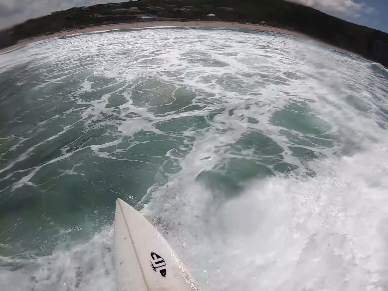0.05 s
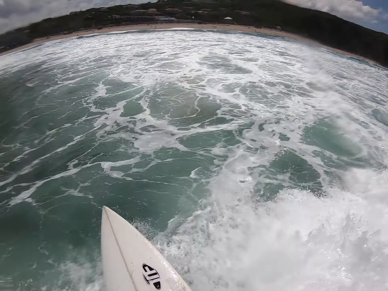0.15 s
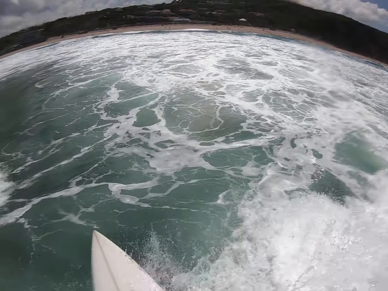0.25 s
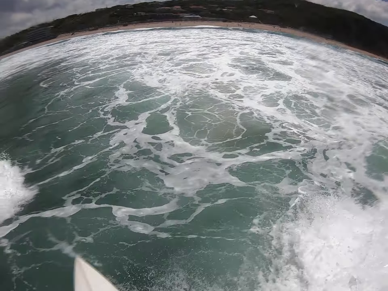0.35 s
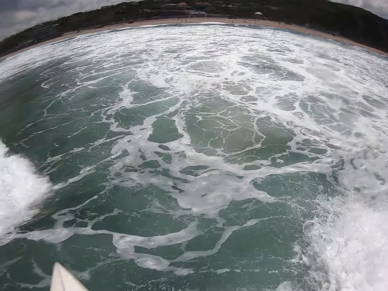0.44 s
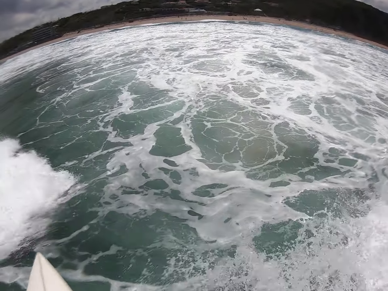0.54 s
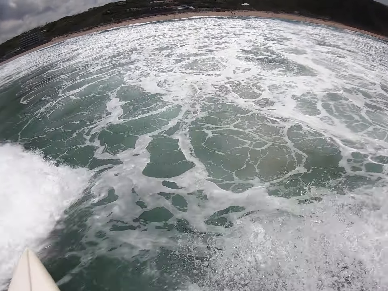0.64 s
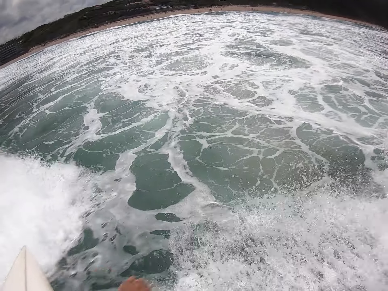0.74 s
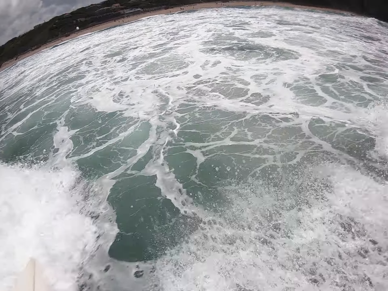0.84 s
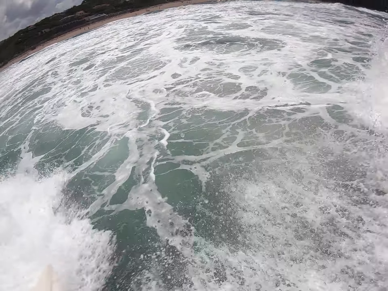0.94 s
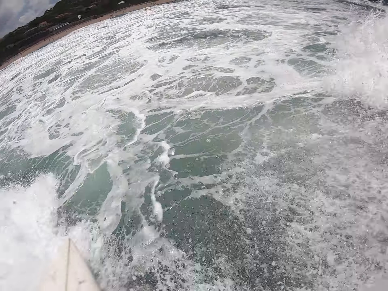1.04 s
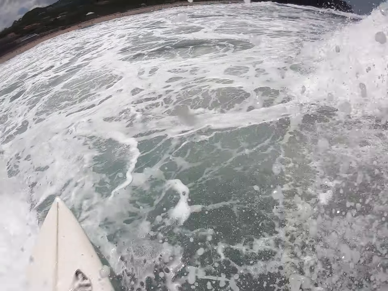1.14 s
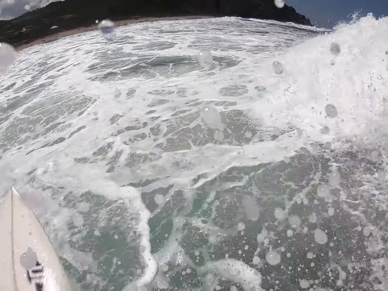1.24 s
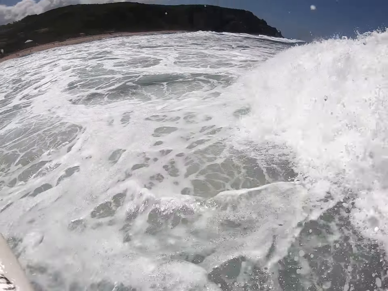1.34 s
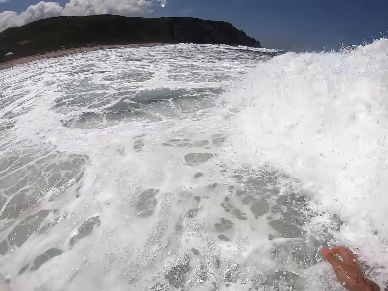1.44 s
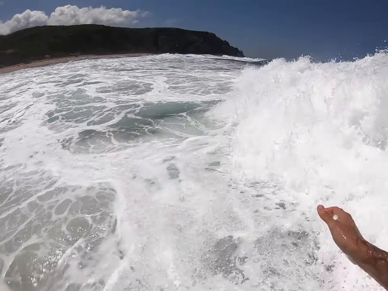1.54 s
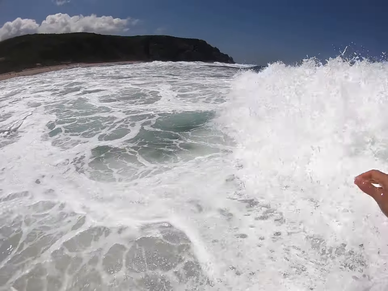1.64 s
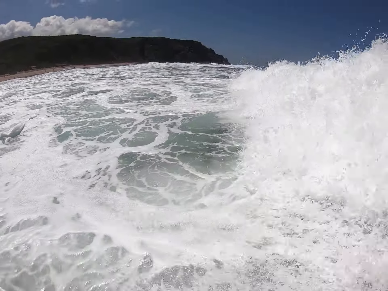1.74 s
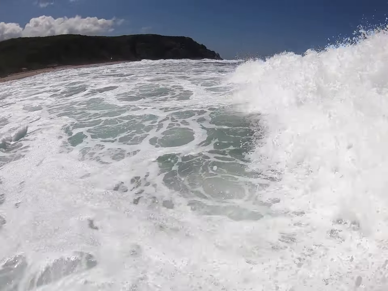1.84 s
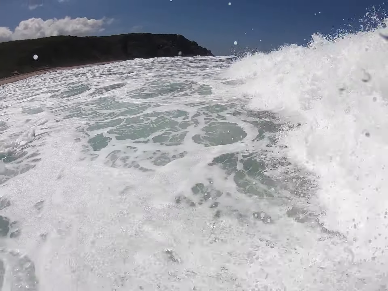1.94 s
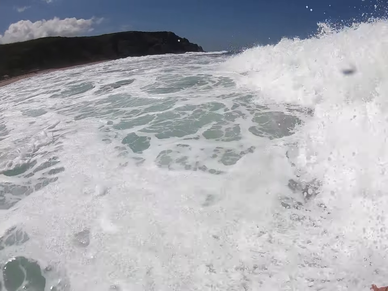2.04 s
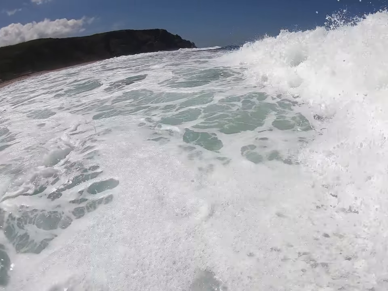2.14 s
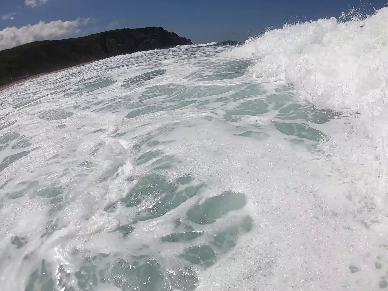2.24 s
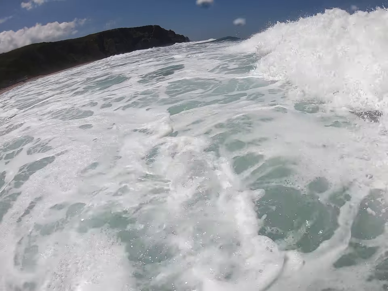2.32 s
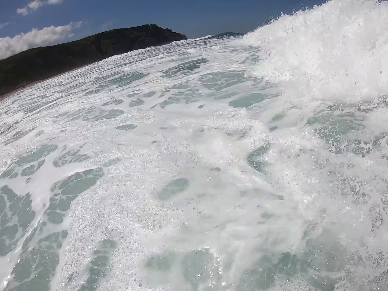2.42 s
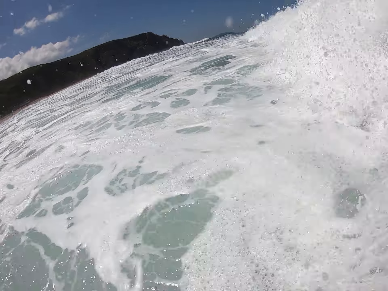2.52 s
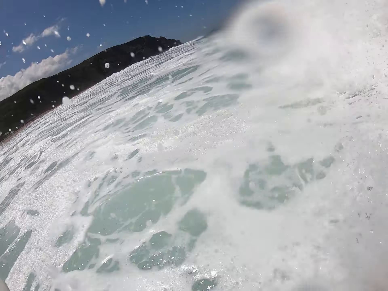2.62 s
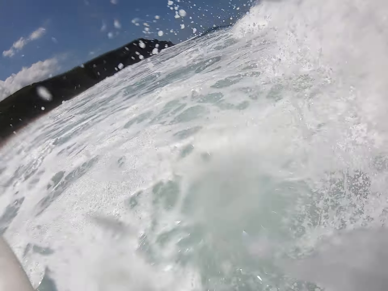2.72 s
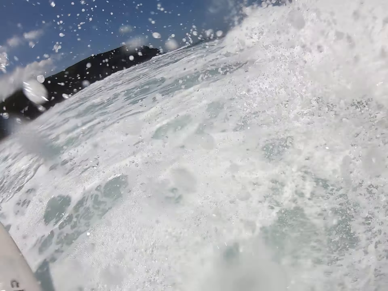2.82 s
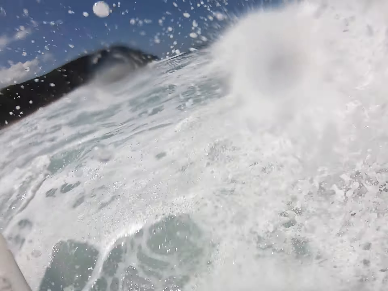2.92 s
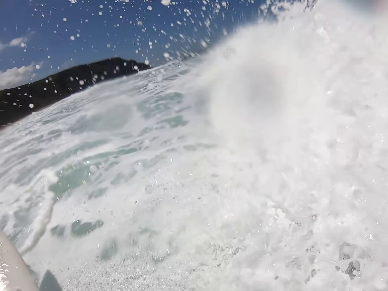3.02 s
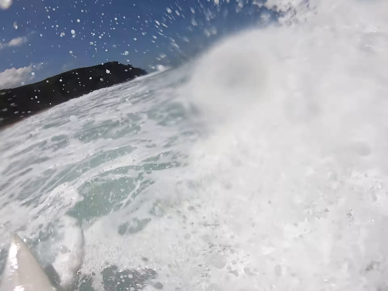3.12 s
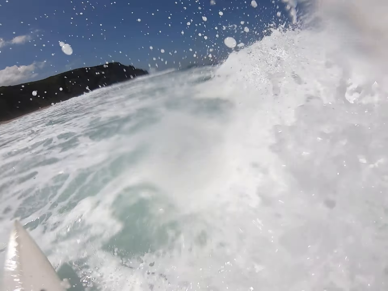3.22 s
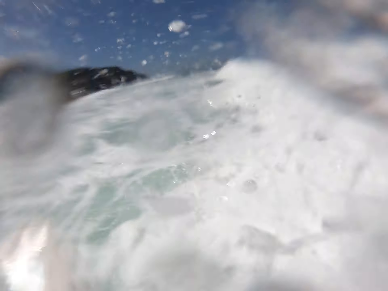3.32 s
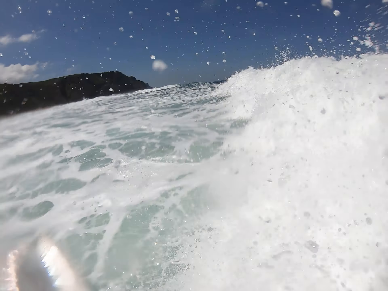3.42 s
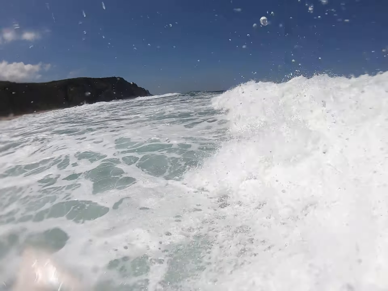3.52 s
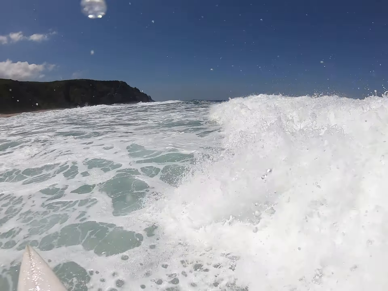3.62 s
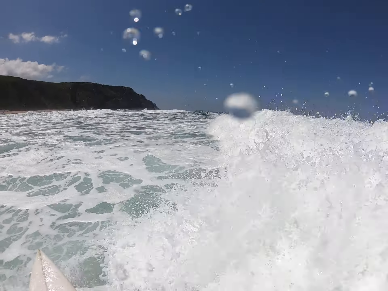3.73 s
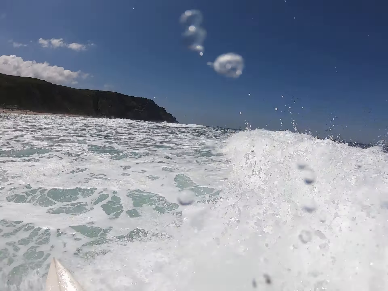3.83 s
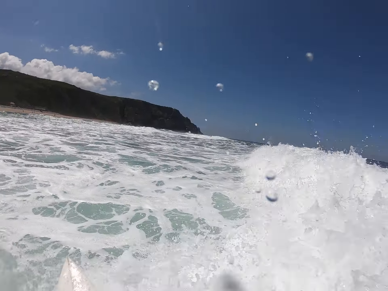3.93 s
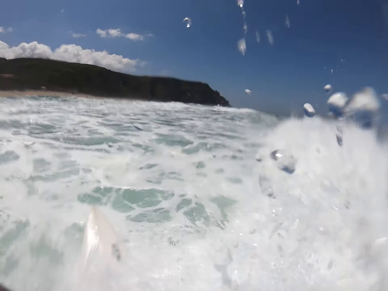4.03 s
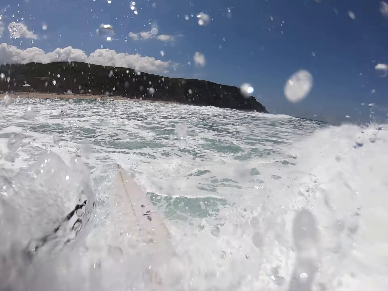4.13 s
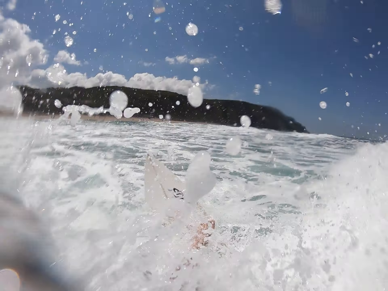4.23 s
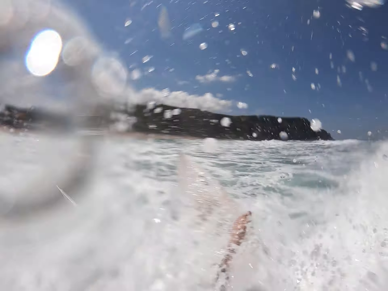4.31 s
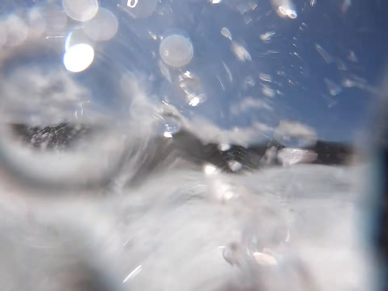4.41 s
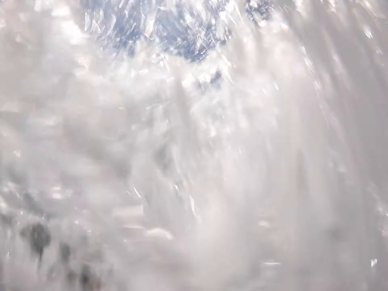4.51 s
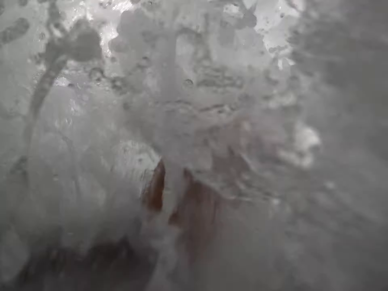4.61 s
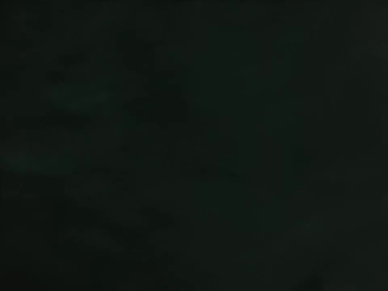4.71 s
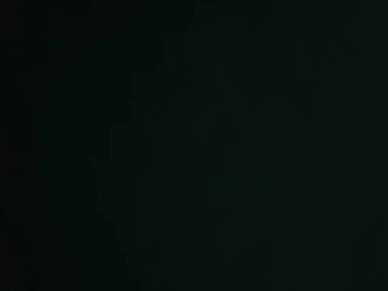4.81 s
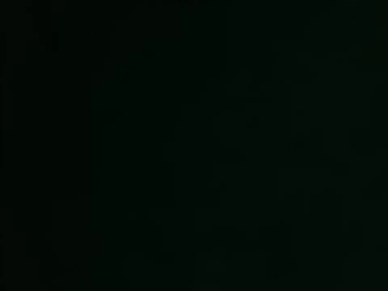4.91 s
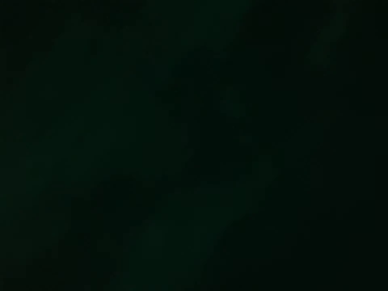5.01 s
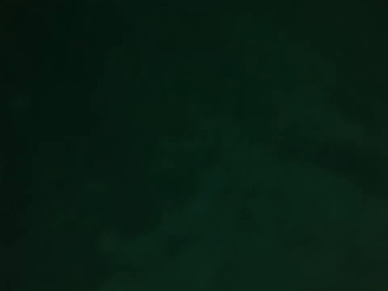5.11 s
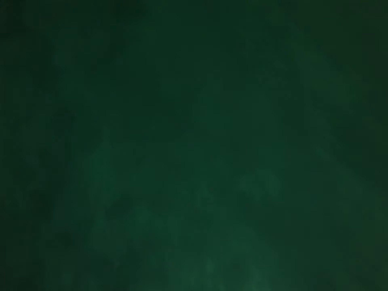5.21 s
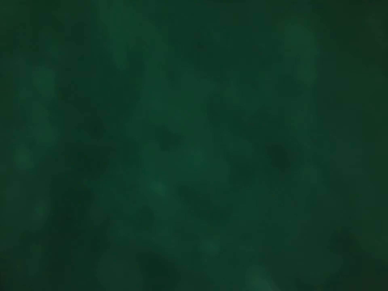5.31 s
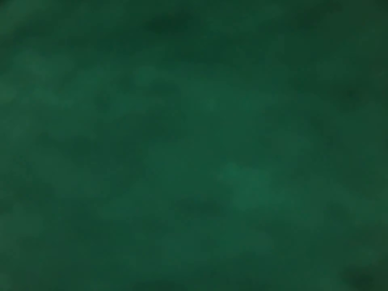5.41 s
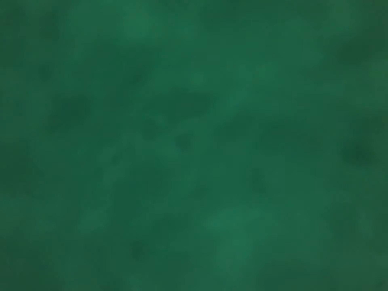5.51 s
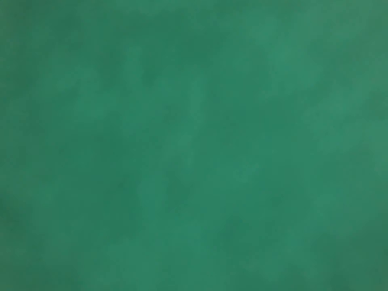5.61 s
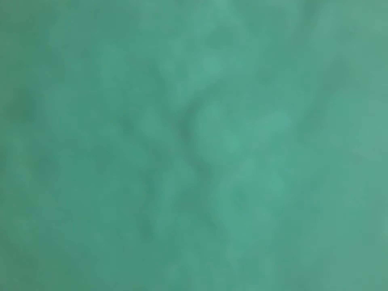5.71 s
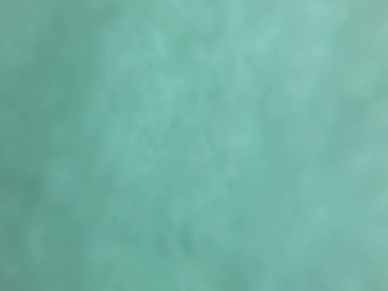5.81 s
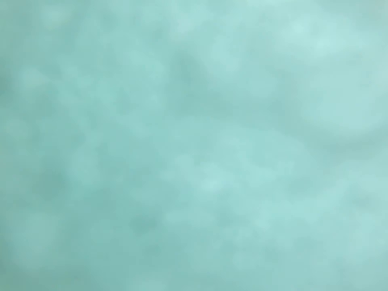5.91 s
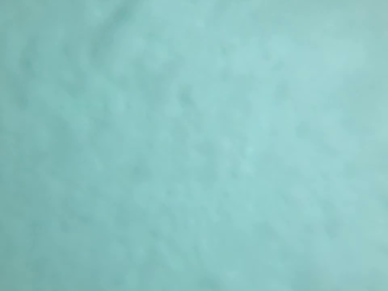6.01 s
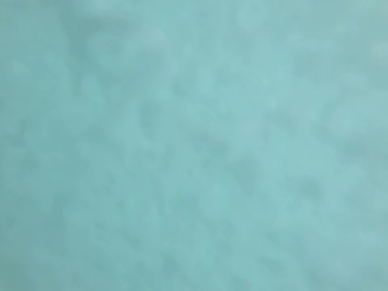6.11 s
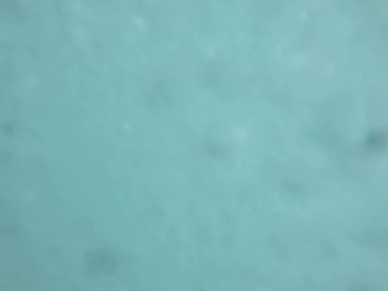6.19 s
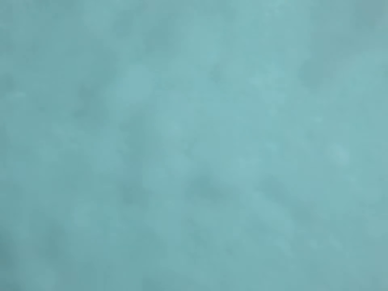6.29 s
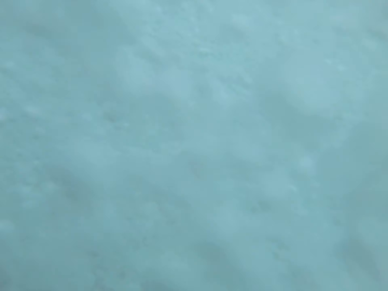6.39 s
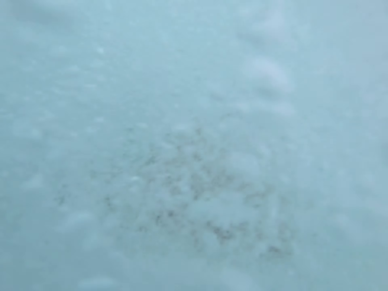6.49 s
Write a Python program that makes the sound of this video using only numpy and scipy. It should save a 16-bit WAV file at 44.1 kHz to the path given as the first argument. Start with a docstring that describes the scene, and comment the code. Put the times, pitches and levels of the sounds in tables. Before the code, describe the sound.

Whitewater churns and splashes against a camera on a surfboard, then a wave swallows it into muffled underwater gurgling.

```python
"""A camera in a waterproof case rides a surfboard through whitewater: turbulence buffets it, foam
churns and fizzes, and spray hisses off the board's edge. Splashes slap the case, and the water running
over its wall makes it ring. After a lull with a few drips, the impacts crowd together from 4.1 s, and
near 4.9 s the wave swallows the case. Under water the hum of the eddies sinks in pitch and bubbles
gurgle; from 5.8 s the flow is quiet, and they tick and crackle as the camera drifts upward."""
import sys
import numpy as np
from scipy import signal
from scipy.fft import rfft, irfft, next_fast_len
from scipy.io import wavfile
from scipy.ndimage import map_coordinates

SR = 44100
rng = np.random.default_rng(int(sys.argv[2]) if len(sys.argv) > 2 else 0)


def store_pcm(level_fs):
    """Save levels as 16-bit WAV."""
    pcm = np.round(np.clip(level_fs, -1, 1) * 32767).astype(np.int16)
    wavfile.write(sys.argv[1], SR, np.atleast_2d(pcm).T)


N = 288855

# how broken the water is: t/s, share of the power that comes as separate drops and bubbles (0-1)
BROKEN_SHARE = [(0, 0.4), (1.0, .25), (1.25, 0.6), (1.6, 0.38), (2.3, 0.2), (2.7, 0.64), (3.2, 0.5),
                (4.6, 0.44), (6.55, 1)]


def amp(db):
    """Amplitude ratio of a level in decibels."""
    return 10 ** (np.asarray(db) / 20)


def unit(x):
    """Normalisation to rms 1."""
    return x / np.sqrt(np.mean(x ** 2) + 1e-20)


def curves(rows):
    """Linear interpolation: one value per sample for each column after the time."""
    times, *columns = np.transpose(rows)
    return [np.interp(np.arange(N) / SR, times, column) for column in columns]


def wobble(knots_per_s):
    """Slow noise: a spline through Gaussian random knots."""
    knots = rng.standard_normal(int(N * knots_per_s / SR) + 4)
    return map_coordinates(knots, [np.arange(N) * knots_per_s / SR])


def colour(x, spectrum):
    """Minimum-phase filtering by a gain curve of (f/Hz, gain/dB) points."""
    size = 2 * next_fast_len(N // 2 + SR // 4)
    hz, db = np.transpose(spectrum)
    gain = amp(np.interp(np.log(np.fft.rfftfreq(size, 1 / SR) + 1), np.log(hz), db))
    cepstrum = irfft(np.log(gain), size)[:size // 2]
    cepstrum[1:] *= 2  # folding the cepstrum makes the filter causal
    return irfft(rfft(x, size) * np.exp(rfft(cepstrum, size)), size)[:N]


def add(track, start_s, sound):
    """Superposition of a sound on the track from start_s on."""
    span = track[round(start_s * SR):][:len(sound)]
    span += sound[:len(span)]


def swell(start_s, hold_s, attack_s, release_s):
    """Exponential growth, a hold at 1 and exponential decay; attack and release are times for 20 dB."""
    end_s = start_s + hold_s
    corners_s = [start_s - 8 * attack_s, start_s, end_s, end_s + 8 * release_s]
    return amp(np.interp(np.arange(N) / SR, corners_s, [-160, 0, 0, -160]))


def swells(rows, attack_s, release_s):
    """Incoherent sum of (t/s, hold/s, level/dB) rows: power, and power-weighted means of other columns."""
    power, weighted = np.zeros(N), np.zeros((len(rows[0]) - 3, N))
    for start_s, hold_s, db, *others in rows:
        event = (amp(db) * swell(start_s, hold_s, attack_s, release_s)) ** 2
        power += event
        weighted += np.outer(others, event)
    return power, *(weighted / power)


def bubble(age, rise):
    """A bubble's oscillation swells, decays and climbs in pitch: (envelope, warped age), in lifetimes."""
    growth = 5 * age
    envelope = (growth * np.exp(1 - growth)) ** 3
    return envelope, age * (1 + rise * age / 2)


def cloud_at(births, hz, spread, cycles, scatter_db, samples):
    """Bubbles born at the given samples add with random phase and log-normal pitch, at rms 1."""
    size_rank, phase = rng.random((len(births), 2)).T
    pitch_hz = hz * np.exp(spread * rng.standard_normal(len(births)))
    age = np.arange(samples) / SR * pitch_hz[:, None] / cycles
    envelope, warped_age = bubble(age, rise=0.14)
    gain = amp(-scatter_db * np.log(np.maximum(size_rank, 0.02)))
    rings = gain[:, None] * envelope * np.sin(2 * np.pi * (cycles * warped_age + phase[:, None]))
    positions = births[:, None] + np.arange(samples)
    return unit(np.bincount(positions.ravel(), rings.ravel())[:N])


def grains(count, hz, spread, cycles, scatter_db, samples):
    """Shot noise: small bubbles round one pitch, born at uniformly random times."""
    return cloud_at(rng.integers(0, N, count), hz, spread, cycles, scatter_db, samples)


def resonance(hz, width_hz, unsteady):
    """A randomly driven resonator gives narrow-band noise; its swells even out as unsteady goes to 0."""
    drive = wobble(width_hz) + 1j * wobble(width_hz)
    evened = drive * (np.abs(drive) ** 2 + 1) ** ((unsteady - 1) / 2)
    phase = 2 * np.pi * np.cumsum(hz) / SR
    return unit(np.real(evened * np.exp(1j * phase)))


def pops(rows, rise):
    """Damped oscillations with a rising pitch, one for each row of (t/s, peak/dB, f/Hz, life/cycles)."""
    t = np.arange(SR // 12) / SR
    out = np.zeros(N)
    for start_s, db, hz, cycles in rows:
        envelope, warped_age = bubble(t * hz / cycles, rise)
        add(out, start_s, amp(db) * envelope * np.sin(2 * np.pi * cycles * warped_age))
    return out


def wall():
    """Forced vibration: the wet wall hums, lower under mass loading; runs of water ring it louder."""
    # runs of water, each pulling the wall to its own pitch: t/s, hold/s, relative level/dB, f/Hz
    runs = [(1.52, .13, -27.5, 725.6), (1.75, 0.549, -29.5, 792.3), (3.363, .025, -18, 762.6),
            (3.508, 0.022, -17, 764.4), (3.542, 0.036, -18, 803.3), (3.602, 0.028, -19.5, 769.4),
            (3.655, 0.1207, -30, 712), (3.8, .25, -41, 697.4), (3.945, 0.035, -34, 710.6),
            (4.706, 0.035, -23, 621.4), (5.536, 0.027, -23.5, 760.2), (5.605, 0.021, -23.5, 720.8),
            (5.645, 0.013, -24.5, 620)]
    rest_hz, = curves([(4.5, 780.5), (6.05, 598)])  # from in air to loaded by water
    rest_power = amp(-39.5) ** 2
    run_power, run_hz = swells(runs, attack_s=0.0143, release_s=0.04026)
    power = rest_power + run_power
    hz = (rest_power * rest_hz + run_power * run_hz) / power
    return np.sqrt(power) * resonance(hz, width_hz=255, unsteady=0.55)


def drips(hz=3770, cycles=24):
    """Impact excitation: fine drops ping on the case at one pitch in the lull between two waves."""
    # drops landing: t/s, peak/dB
    landings = [(3.687, -48), (3.739, -41.5), (3.746, -44), (3.771, -40), (3.801, -43.5), (3.811, -49),
                (3.848, -52), (3.859, -48), (3.876, -39.5), (3.967, -45), (4.022, -53)]
    return pops([(start_s, db, hz, cycles) for start_s, db in landings], rise=0.027)


def patter():
    """Dense shot noise: the finest drops and bubbles meet the case in soft showers."""
    # showers of droplets, or of bubbles under water: t/s, hold/s, level/dB
    showers = [(3.51, 0.12, -44.5), (3.72, 0.16, -47), (3.95, 0.21, -51), (5.25, 0.24, -59),
               (5.53, 0.22, -49), (5.97, 0.65, -70)]
    # their filtering by the case: f/Hz, relative gain/dB
    spectrum = [(1200, -52.5), (2200, 0), (3000, -6.5), (3450, -8.5), (3750, -21.5), (4500, -36.5),
                (6000, -33), (9000, -65.5)]
    cloud = grains(count=14000, hz=2900, spread=0.26, cycles=6.1, scatter_db=3, samples=260)
    power, = swells(showers, attack_s=0.025, release_s=0.036)
    return np.sqrt(power) * unit(colour(cloud, spectrum))


def spatter():
    """Sparse shot noise: coarse drops and bubbles crackle as a wave hits and as the camera rises."""
    # bursts of crackle: t/s, hold/s, level/dB
    bursts = [(1.21, 0.086, -34), (4.605, 0.042, -27), (4.735, 0.048, -29), (5.8, .4, -52.5)]
    # their filtering by the case: f/Hz, relative gain/dB
    spectrum = [(700, -16), (1200, 11.5), (1800, -6.5), (2700, -13), (3600, -22), (5000, -10.5),
                (7000, -34.5), (10000, -51.5)]
    cloud = grains(count=2200, hz=2000, spread=0.45, cycles=6.4, scatter_db=6, samples=500)
    power, = swells(bursts, attack_s=0.0082, release_s=0.069)
    return np.sqrt(power) * unit(colour(cloud, spectrum))


def rail_power():
    """Incoherent sum of the sheets of spray that the rail, the board's edge, throws in its turns."""
    # sheets of spray: t/s, hold/s, level/dB, attack/s, release/s
    sheets = [(0.115, 0.318, -31.5, 0.18, 0.022), (0.503, 0.42, -44.5, 0.083, .1),
              (0.957, .06, -36.5, 0.23, 0.29), (1.846, 0.12, -30.5, 0.11, 1),
              (2.653, 0.071, -44.5, 0.27, 0.076), (3.51, 0.11, -38, 0.072, 0.016)]
    return sum((amp(db) * swell(start_s, hold_s, attack_s, release_s)) ** 2
               for start_s, hold_s, db, attack_s, release_s in sheets)


def rail_hiss():
    """Transmission through the case turns the broadband noise of the rail's spray into a hollow hiss."""
    # the hiss inside the case: f/Hz, relative spectral density/dB
    spectrum = [(900, -65.5), (1450, -4.5), (1700, -2), (1880, 0.5), (2080, -11.5), (2400, -23.5),
                (2750, -19.5), (3100, -14), (3600, -25.5), (3950, -41), (4300, -25.5), (4900, -40),
                (6500, -57), (10000, -100)]
    return np.sqrt(rail_power()) * unit(colour(rng.standard_normal(N), spectrum))


def eddies(pitch_waver=0.0706, waver_db=5):
    """Vortex shedding: the case hums roughly at a pitch that follows the flow and sinks as it slows."""
    # trains of eddies: t/s, hold/s, relative level/dB, first f/Hz, last f/Hz
    trains = [(2.52, 0.072, -20.5, 109.7, 89.5), (2.96, 0.19, -22, 72.7, 99.3),
              (3.178, 0.078, -26, 104, 115.5), (4.92, 0.077, -19, 190, 182),
              (5.055, 0.092, -26.5, 180, 131), (5.25, 0.19, -24.5, 120, 81.3)]
    out = np.zeros(N)
    for start_s, hold_s, db, first_hz, last_hz in trains:
        glide_hz, = curves([(start_s, first_hz), (start_s + hold_s, last_hz)])
        hz = glide_hz * np.exp(pitch_waver * wobble(90))
        hum = unit(amp(waver_db * wobble(80)) * np.sin(2 * np.pi * np.cumsum(hz) / SR))
        out += amp(db) * swell(start_s, hold_s, attack_s=0.04, release_s=0.09) * hum
    return out


def gurgle(count=4000):
    """Bubbles of like size resonate at like frequencies, so a passing swarm has a broad pitch."""
    # swarms sweeping past the case: t/s, hold/s, relative level/dB, f/Hz
    swarms = [(1.41, 0.086, -25.5, 414), (1.5, 0.11, -21, 562), (3.22, 0.09, -25, 517),
              (3.365, 0.012, -22.5, 925), (3.53, 0.066, -30.5, 739), (4.301, 0.21, -32, 1040),
              (4.512, 0.023, -23.5, 795), (4.596, 0.014, -17.5, 1137), (4.76, 0.12, -29, 966),
              (4.953, 0.16, -31, 840), (5.148, 0.1, -23, 857), (5.324, 0.062, -30.5, 915),
              (5.432, 0.037, -20.5, 780), (5.52, 0.038, -21.5, 830), (5.626, 0.013, -28.5, 1024),
              (5.699, 0.063, -33, 922), (5.83, 0.34, -51, 1080), (6.47, 0.088, -48, 1230)]
    power, hz = swells(swarms, attack_s=0.075, release_s=0.069)
    births = rng.integers(0, N, count)
    cloud = cloud_at(births, hz[births], spread=0.17, cycles=14.1, scatter_db=-0.5, samples=1200)
    return np.sqrt(power) * cloud


def plops():
    """Bubble resonance: air is the spring and water the mass, so big pockets gulp and small ones tick."""
    # single bubbles: t/s, peak/dB, f/Hz, life/cycles
    bubbles = [(.267, -16, 1360, 7), (1.2445, -12.5, 2614, 16), (1.606, -10.5, 752, 7.3),
               (2.887, -33.5, 4530, 8.7), (2.970, -41, 5130, 9.3), (3.373, -8.5, 640, 13),
               (3.380, -12, 430, 7.8), (3.409, -16.5, 650, 16), (3.510, -16, 670, 12),
               (3.529, -19, 890, 18), (3.632, -10.5, 800, 6.2), (3.633, -6.5, 520, 5.4),
               (3.641, -5, 450, 4.6), (3.7045, -9, 600, 9.7), (4.170, -16, 1540, 5.5),
               (4.184, -35.5, 5300, 11.2), (4.704, -5, 550, 7.2), (4.706, -8, 350, 16),
               (4.712, -9.5, 690, 16), (4.732, -9, 760, 12), (4.759, -5, 400, 6.3), (4.770, -16, 1410, 7),
               (5.096, -16.5, 1201, 8.5), (5.151, -16, 789, 8), (5.375, -15, 1000, 9.8),
               (5.433, -16, 720, 10), (5.634, -14, 659, 6.5), (5.768, -33, 1800, 12),
               (5.841, -22.5, 780, 14), (5.895, -31, 1140, 8.6), (5.97, -24, 700, 8),
               (5.989, -26, 1100, 7.9), (6.057, -30, 1150, 9.1), (6.153, -26.5, 1100, 9.2),
               (6.155, -33, 2100, 7), (6.188, -23, 560, 12), (6.190, -29.5, 1130, 12),
               (6.200, -35, 1500, 6.4), (6.2502, -24.5, 1880, 4.9), (6.2565, -29, 1430, 10),
               (6.303, -22, 560, 8.9), (6.429, -27.5, 581, 13), (6.435, -32, 1400, 7),
               (6.52, -19.5, 608, 11)]
    return pops(bubbles, rise=0.048)


def cracks(attack_s=0.0007, scatter_db=2):
    """Modal ringing: each blow excites all modes of the case, from loud dull cracks to faint bright ticks."""
    # hard drops and bursting bubbles: t/s, peak/dB, tilt/(dB per octave)
    blows = [(1.2094, -16, -2), (1.2440, -7, -1), (1.3055, -14, -9), (2.887, -19.5, 2), (3.346, -16, 0),
             (3.368, -12, -4), (4.177, -28, 6), (4.7285, -10.5, -1), (4.941, -12.5, -8), (5.185, -22.5, 7),
             (5.433, -19.5, 1), (5.999, -31.5, 3), (6.076, -43, 9), (6.096, -38, 3), (6.109, -31.5, 9),
             (6.139, -32, 9), (6.180, -35, 6), (6.274, -41, 2), (6.321, -40, 11), (6.455, -43, 12)]
    # modes of the case: f/Hz, relative level/dB, T60/s
    case_modes = [(1220, 4, .013), (1750, -0.5, .013), (2250, -1.5, 0.01), (2735, -5, 0.0095),
                  (4400, -23.5, .009), (5500, -29.5, .008)]
    t = np.arange(SR // 25) / SR
    hz, mode_db, t60 = np.transpose(case_modes)[:, :, None]
    onset = 1 - np.exp(-(t / attack_s) ** 2)
    modes = onset * amp(mode_db - 60 * t / t60) * np.sin(2 * np.pi * hz * t)
    out = np.zeros(N)
    for start_s, db, tilt_db in blows:
        weights = amp(tilt_db * np.log2(hz / hz[0]) + scatter_db * rng.standard_normal(hz.shape))
        ring = np.sum(weights * modes, axis=0)
        add(out, start_s, amp(db) * ring / np.abs(ring).max())
    return out


def smacks(attack_s=0.001, t60_s=0.032):
    """Damped band noise: drops land together and ring briefly in the band that their sizes span."""
    # handfuls of spray and froth: t/s, level/dB, lowest f/Hz, highest f/Hz
    handfuls = [(0.999, -16, 920, 2070), (1.209, -16.5, 1050, 1840), (1.303, -21, 1046, 2090),
                (2.558, -17, 890, 2010), (2.568, -8.5, 850, 1890), (2.761, -21, 840, 1860),
                (2.771, -16.5, 1013, 1940), (2.877, -18, 1250, 2390), (2.885, -19.5, 1340, 2390),
                (4.164, -21.5, 895, 2000), (4.181, -17, 900, 1900), (4.198, -16.5, 885, 1950),
                (4.243, -15.5, 620, 1330), (4.256, -15.5, 620, 1316), (4.598, -19, 950, 2170),
                (4.733, -13.5, 1150, 1890), (4.751, -31, 2820, 5170), (4.752, -14.5, 1000, 1910),
                (4.761, -11.5, 700, 1540), (4.785, -16.5, 1100, 1810)]
    t = np.arange(SR // 12) / SR
    envelope = (1 - np.exp(-t / attack_s)) * amp(-60 * t / t60_s)
    out = np.zeros(N)
    for start_s, db, low_hz, high_hz in handfuls:
        band = signal.butter(6, [low_hz, high_hz], "bandpass", fs=SR, output="sos")
        noise = signal.sosfilt(band, rng.standard_normal(2 * len(t)))
        drops = unit(noise[len(t):])  # once the filter has settled
        add(out, start_s, amp(db) * envelope * drops)
    return out


def slaps(thud_db=-2, thud_cycles=4, splatter_db=-3, splatter_t60_s=0.019):
    """Momentum transfer: each lump of water gives the case a low, damped push and a dull splatter."""
    # lumps of water: t/s, relative level/dB, thud f/Hz, relative splatter level/dB
    lumps = [(.258, -2.5, 55.5, -12.5), (1.215, -3.5, 127.5, -22.5), (1.686, -0.5, 62, -24.5),
             (2.828, -6.5, 150, -20), (2.894, -8, 92.2, -23), (2.902, -0.5, 241, -25.5),
             (3.367, -1.5, 126, -6), (3.379, -3, 200, -2), (3.385, -1, 111, -16), (3.406, 1, 68, -11.5),
             (4.121, -4, 73.8, -17.5), (4.162, -14, 183.7, 0.5), (4.203, -2, 116.2, -11.5),
             (4.237, -6.5, 92.6, -8.5), (4.257, -1, 292, -20), (4.291, -2.5, 97.3, -20.5),
             (4.316, 2, 170, -23), (4.42, -2.5, 72.8, -14), (4.422, -6.5, 498, -21.5),
             (4.625, 0.5, 108, -9), (4.635, 0.5, 99, -18.5), (4.645, 3, 93, -19.5), (4.762, -1.5, 119, -11),
             (4.795, -1.5, 123.5, -19), (4.818, -1, 103.7, -8), (4.9, -4.5, 86.7, -7.5),
             (4.942, -6.5, 178.5, 0), (5.158, -5, 79.6, -7), (5.417, -2, 82.7, -17)]
    t = np.arange(SR // 8) / SR
    thuds, splatter = np.zeros(N), np.zeros(N)
    for start_s, db, hz, bright_db in lumps:
        thud = amp(thud_db - 60 * t * hz / thud_cycles) * np.sin(2 * np.pi * hz * t)
        burst = amp(splatter_db - 60 * t / splatter_t60_s) * rng.standard_normal(len(t))
        add(thuds, start_s, amp(db) * thud)
        add(splatter, start_s, amp(db + bright_db) * burst)
    # the case passes no steady pressure, and the soft water no sharp edge: f/Hz, gain/dB
    thud_filter = [(10, -32.5), (45, -5), (70, -1.5), (700, 6.5), (2500, -13), (7000, -40)]
    splatter_filter = [(100, -4.5), (350, 15.5), (750, 21), (1500, 1), (2600, -17), (5500, -29.5),
                       (9000, -48.5), (12000, -66.5)]
    return colour(thuds, thud_filter) + colour(splatter, splatter_filter)


def flow_gains(rail_fizz_db=-22.5):
    """Powers add: gains of buffet, churn, spray and fizz from steady flow, surges and the rail's foam."""
    # steady flow round the case: t/s, then relative level/dB of buffet, churn, spray and fizz
    steady_flow = [(0, -21, -23, -34, -57), (.36, -19, -21.5, -26.5, -55), (.55, -21, -24.5, -33.5, -63),
                   (.88, -24, -24.5, -35, -61), (1.25, -20, -20, -26.5, -58), (1.56, -23, -20.5, -30, -65),
                   (2.2, -21.5, -19.5, -27.5, -54.5), (2.42, -15, -21.5, -33, -77),
                   (2.7, -20.5, -21.5, -26.5, -63.5), (2.8, -16.5, -21.5, -28, -60),
                   (3.14, -20, -22.5, -36.5, -65.5), (3.36, -21, -17, -29.5, -57.5),
                   (3.46, -22, -22.5, -39, -60.5), (3.66, -24, -31.5, -38.5, -69.5),
                   (3.82, -29.5, -33.5, -40.5, -70), (4.05, -23, -33, -39, -69),
                   (4.55, -27, -27.5, -39.5, -71), (4.69, -19.5, -28.5, -38, -57.5),
                   (4.88, -25, -28.5, -39.5, -59), (5.03, -20.5, -25, -36, -60),
                   (5.33, -27.5, -38.5, -41, -61.5), (5.66, -24.5, -29.5, -38.5, -57.5),
                   (5.86, -36, -37, -58.5, -74.5), (6.55, -33.5, -38.5, -63, -72)]
    # masses of whitewater washing over the case: t/s, hold/s, relative churn level/dB, attack/s,
    # buffet re churn/dB, spray re churn/dB, fizz re spray/dB
    surges = [(1.234, 0.063, -31, 0.05, 10.5, 1.5, -30), (2.756, 0.026, -18, 0.05, -4.5, -22, -32),
              (2.893, 0.034, -28, .058, 12, -2.5, -31), (3.341, 0.022, -22, 0.053, -6, -6.5, -22.5),
              (4.174, 0.029, -17, 0.06, -1.5, -8.5, -31), (4.237, 0.01, -19.5, 0.034, 7.5, -14.5, -44),
              (4.513, 0.082, -29, 0.067, 5.5, -4.5, -35), (4.603, 0.044, -14.5, 0.057, 3, -17, -16),
              (4.745, 0.022, -13.5, 0.022, -1, -12.5, -18), (4.784, 0.034, -15.5, 0.033, 1.5, -12, -30),
              (4.861, 0.064, -18.5, 0.072, -0.5, -11, -29.5), (5.104, 0.068, -24, 0.065, 5.5, -7, -22),
              (5.2, 0.11, -36, .058, 0, 1, -19), (5.428, 0.037, -32.5, 0.032, 6, -5, -19),
              (5.521, 0.034, -31.5, 0.063, 0, 1.5, -28), (5.627, .03, -26.5, .058, 2, -5.5, -23),
              (5.984, 0.013, -32, .058, -19, -30.5, -36), (6.188, 0.017, -28, .04, -7, -16.5, -23),
              (6.484, 0.11, -35.5, .058, -10, -16, -24)]
    buffet, churn, spray, fizz = amp(curves(steady_flow)) ** 2
    for start_s, hold_s, churn_db, attack_s, buffet_db, spray_db, fizz_db in surges:
        surge = (amp(churn_db) * swell(start_s, hold_s, attack_s, release_s=0.023)) ** 2
        buffet += amp(buffet_db) ** 2 * surge
        churn += surge
        spray += amp(spray_db) ** 2 * surge
        fizz += amp(spray_db + fizz_db) ** 2 * surge
    fizz += amp(rail_fizz_db) ** 2 * rail_power()
    return np.sqrt([buffet, churn, spray, fizz])


def water(spectrum, **grain_settings):
    """Equal-power mix of a smooth rush and a cloud of bubbles, set by how broken the water is."""
    broken, = curves(BROKEN_SHARE)
    cloud = unit(colour(grains(**grain_settings), spectrum))
    rush = unit(colour(rng.standard_normal(N), spectrum))
    return np.sqrt(1 - broken) * rush + np.sqrt(broken) * cloud


def whitewater(flutter_depth_db=3, calming=0.83):
    """Flow noise: turbulent pressure buffets the case, big bubbles churn, drops spray and foam fizzes."""
    # the wave closes over the case: t/s, share under water (0-1)
    submersion = [(4.78, 0.08), (4.98, 0.87)]
    # each part of the flow as heard through the case: f/Hz, relative gain/dB
    buffet_band = [(12, -18), (28, -6.5), (50, -2.5), (90, -2), (160, -2), (240, -7), (400, -15),
                   (900, -78.5), (2500, -120)]
    churn_band = [(100, -17), (200, -1.5), (300, -2), (450, -2), (620, -3.5), (820, -4.5), (950, -18),
                  (1400, -29), (2500, -77), (5000, -120)]
    spray_band = [(500, -31.5), (900, 2.5), (1250, 1), (1500, 0), (1850, -5.5), (2150, -7.5), (2550, -14.5),
                  (3200, -22), (3550, -43), (5000, -55), (12000, -100)]
    foam_band = [(1500, -18.5), (2400, 0), (3200, 4.5), (3650, -2), (3950, -2), (4300, -3), (5200, -10),
                 (6300, -11), (7500, -15.5), (9000, -19), (10500, -32.5), (12500, -54)]
    sunken_band = [(1500, -13), (2400, 7.5), (3100, 5.5), (3700, -2.5), (4400, -5), (5500, -8.5),
                   (6500, -16), (7500, -20.5), (9000, -22), (12000, -58)]  # foam is duller under water
    buffet_gain, churn_gain, spray_gain, fizz_gain = flow_gains()
    under, = curves(submersion)
    broken, = curves(BROKEN_SHARE)
    # churn, spray and fizz share one flutter, calmer under water
    flutter_db = flutter_depth_db * (1 - calming * under) * broken * (wobble(45) + wobble(170))
    buffet = unit(colour(rng.standard_normal(N), buffet_band))
    churn = water(churn_band, count=3000, hz=490, spread=0.513, cycles=4.5, scatter_db=2.5, samples=1300)
    spray = water(spray_band, count=5000, hz=1537, spread=0.42, cycles=8.6, scatter_db=2.5, samples=450)
    foam = water(foam_band, count=7000, hz=4280, spread=0.47, cycles=2.5, scatter_db=2.5, samples=200)
    sunken = water(sunken_band, count=7000, hz=4200, spread=0.33, cycles=24, scatter_db=6, samples=400)
    fizz = np.sqrt(1 - under) * foam + np.sqrt(under) * sunken
    return (buffet_gain * amp(-1) * buffet
            + churn_gain * unit(churn * amp(0.59 * flutter_db))
            + spray_gain * amp(1) * unit(spray * amp(flutter_db))
            + fizz_gain * amp(4) * unit(fizz * amp(flutter_db)))


def scene():
    """Superposition of all sources as heard inside the case, without reverberation."""
    bubbles = amp(-1) * gurgle() + plops()
    surf = whitewater() + rail_hiss() + patter() + spatter()
    hums = amp(1.5) * wall() + amp(1) * eddies()
    impacts = slaps() + smacks() + cracks() + drips()
    return (hums + bubbles + impacts + surf)[None]


def record(dry, peak_limit=0.86, top_hz=12400):
    """Soft saturation rounds off the highest peaks, and a low-pass removes all above the band limit."""
    rounded = dry / (1 + np.abs(dry / peak_limit) ** 6) ** (1 / 6)
    size = next_fast_len(N + SR // 2)
    passband = np.fft.rfftfreq(size, 1 / SR) < top_hz
    return irfft(rfft(rounded, size) * passband, size)[..., :N]


dry = scene()
out = record(dry)
store_pcm(out)
```